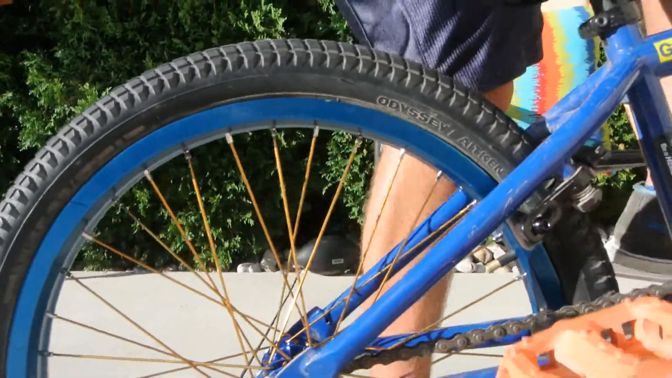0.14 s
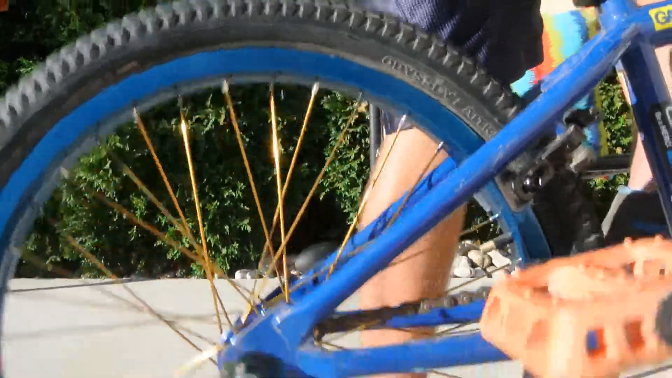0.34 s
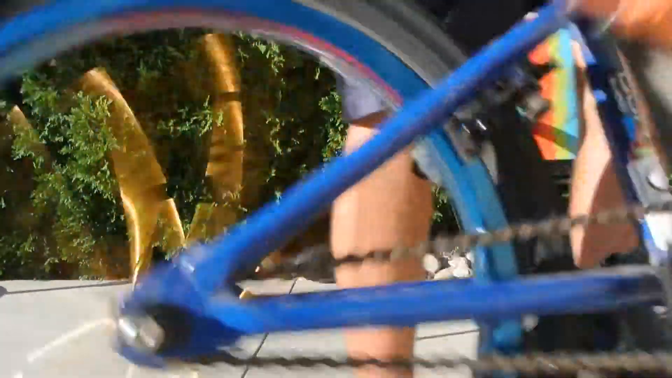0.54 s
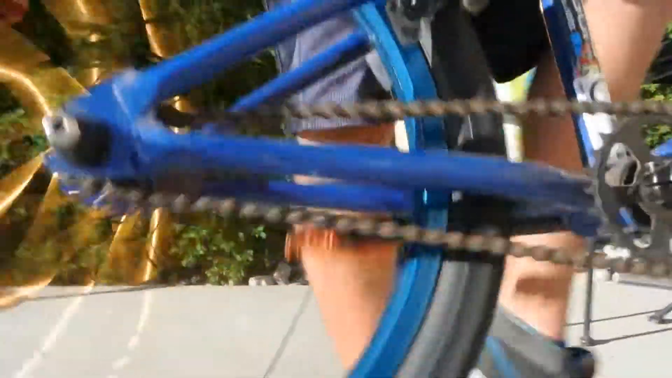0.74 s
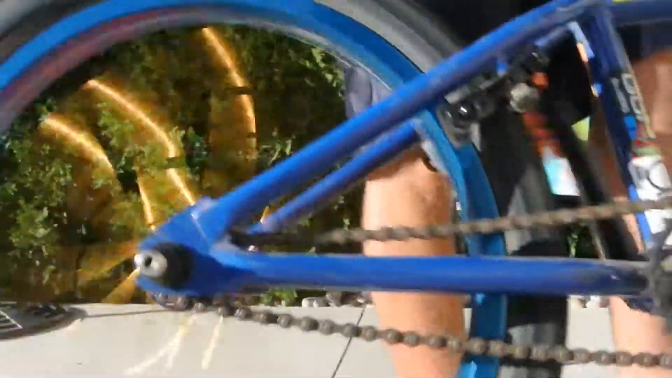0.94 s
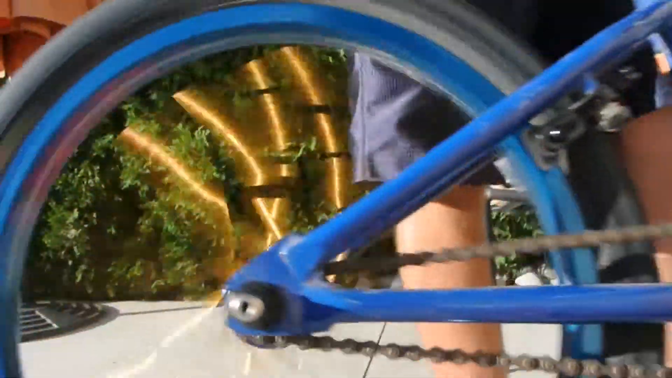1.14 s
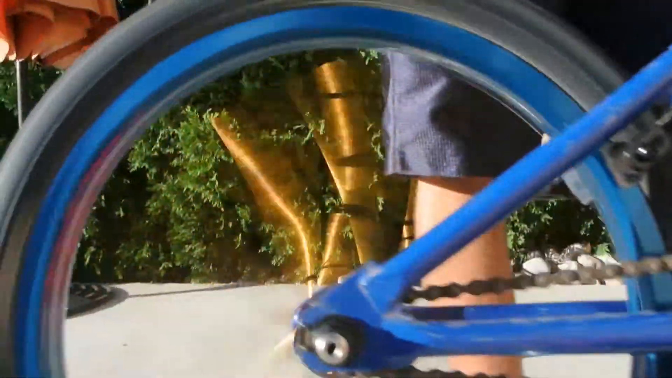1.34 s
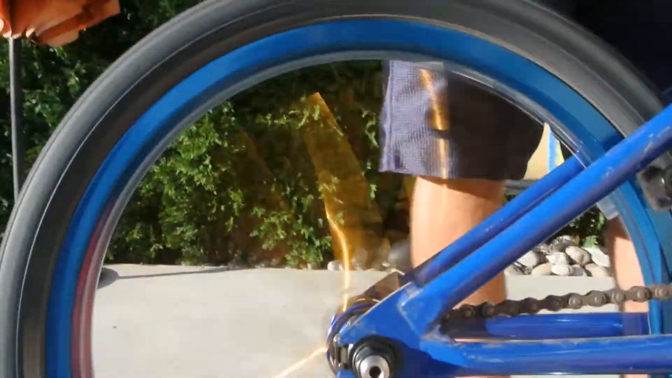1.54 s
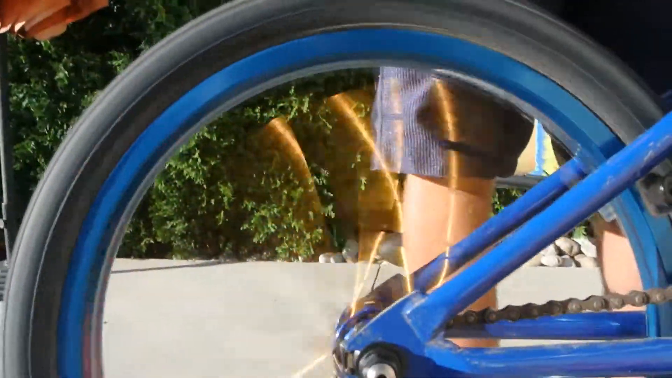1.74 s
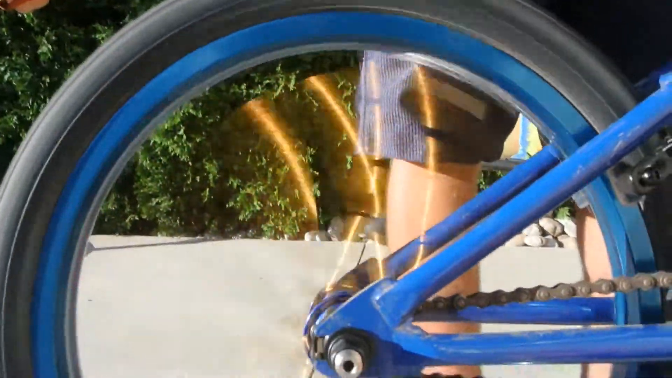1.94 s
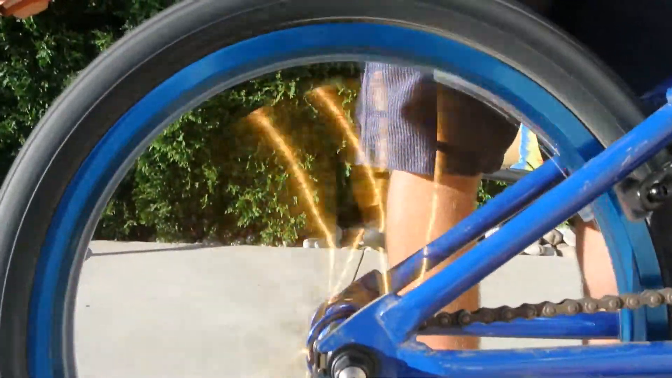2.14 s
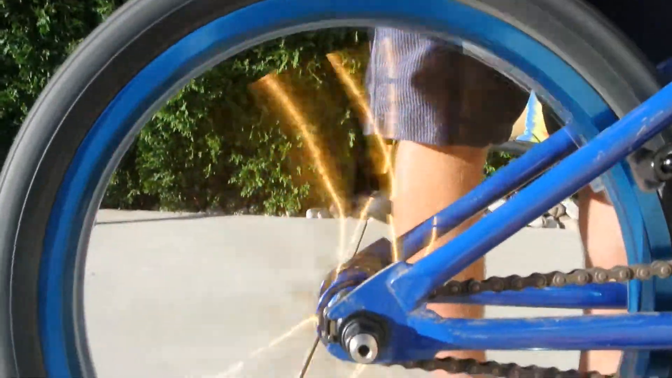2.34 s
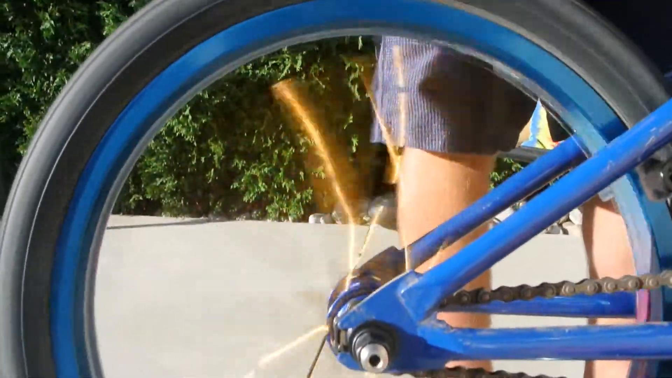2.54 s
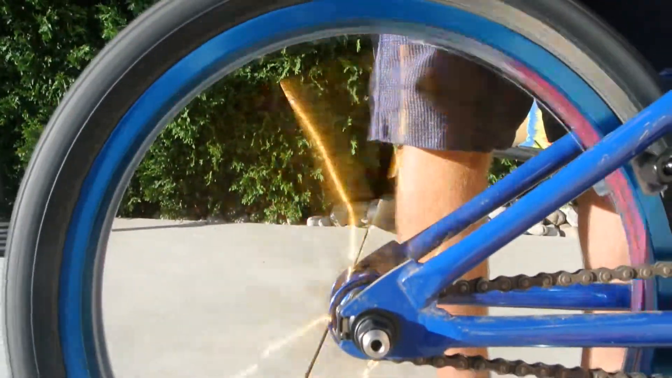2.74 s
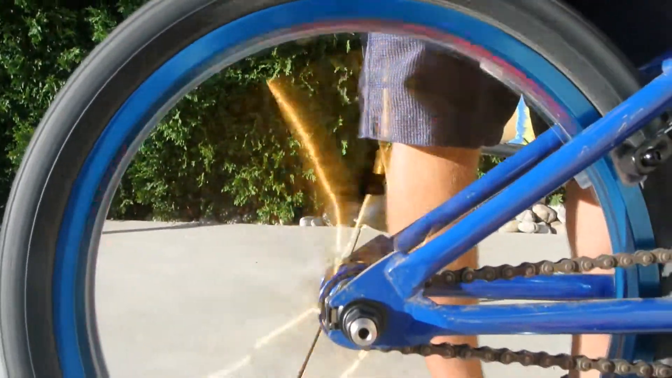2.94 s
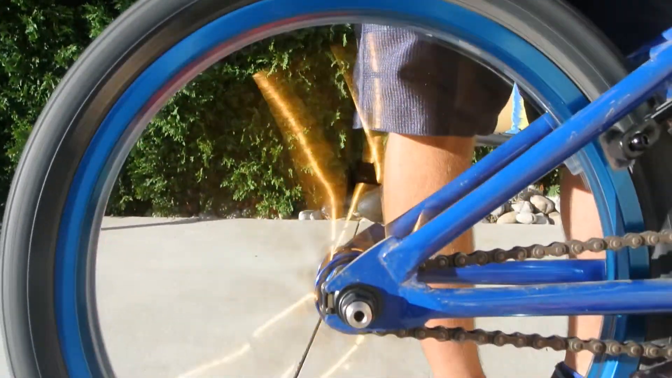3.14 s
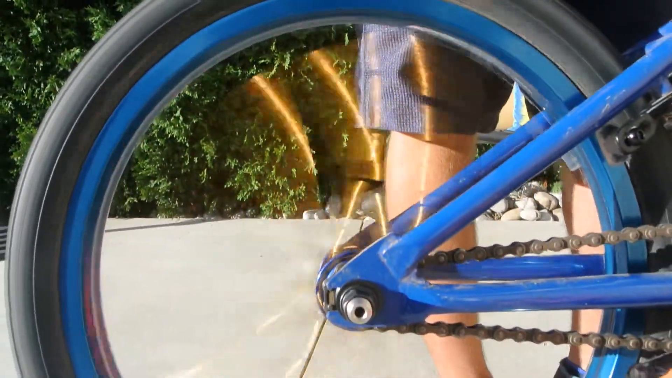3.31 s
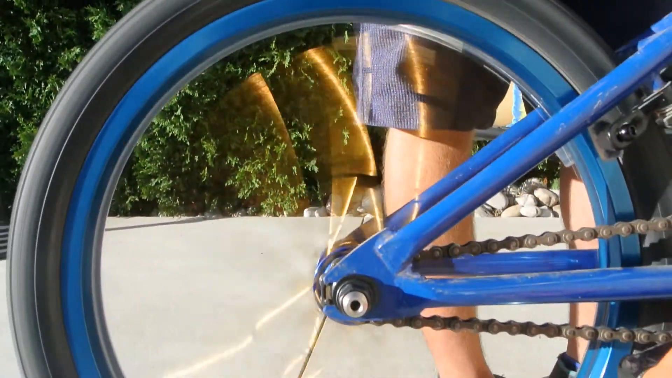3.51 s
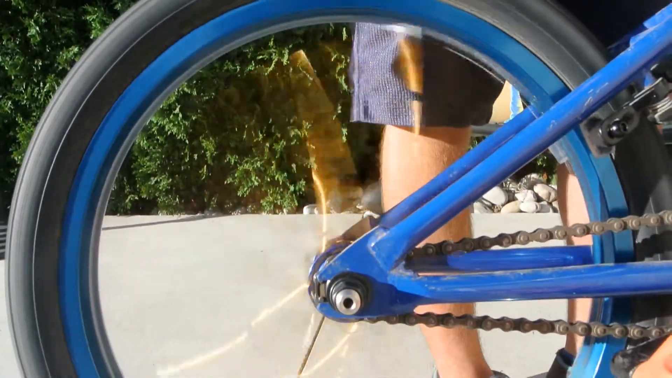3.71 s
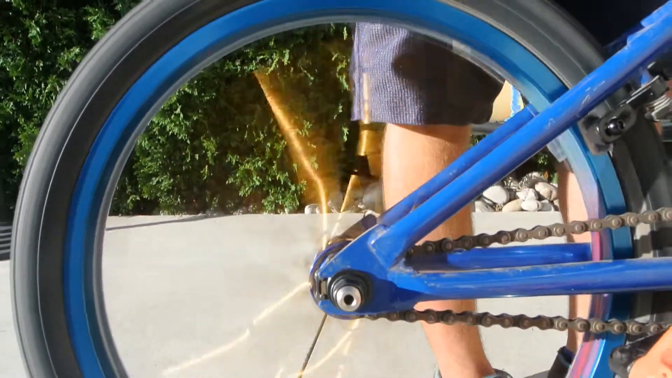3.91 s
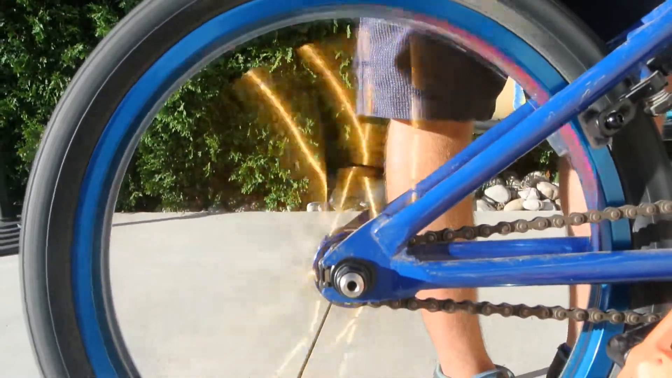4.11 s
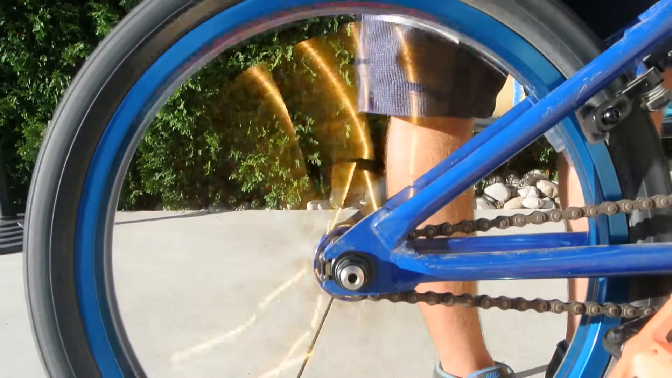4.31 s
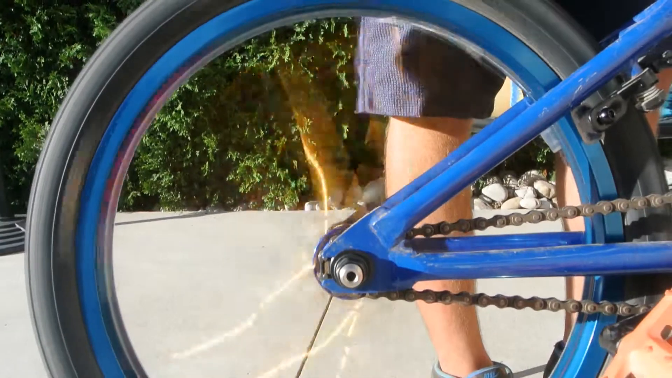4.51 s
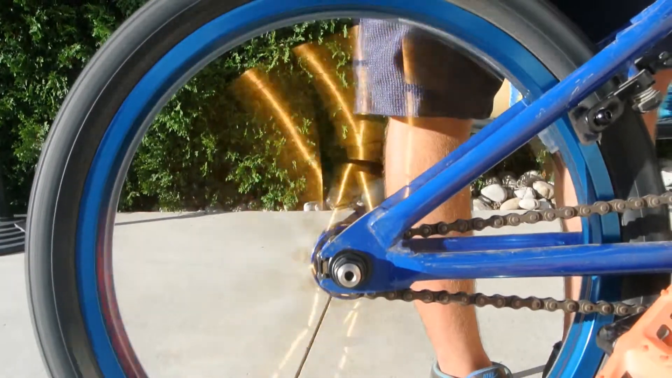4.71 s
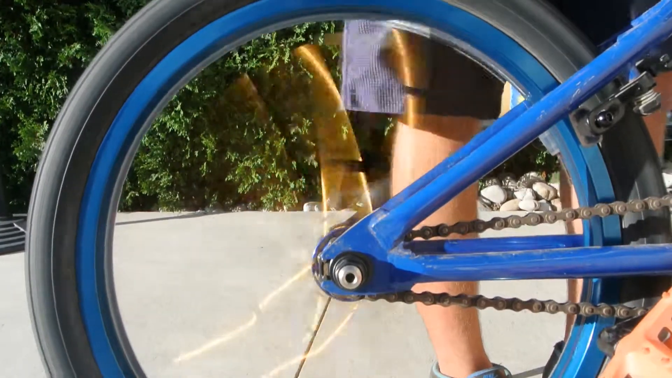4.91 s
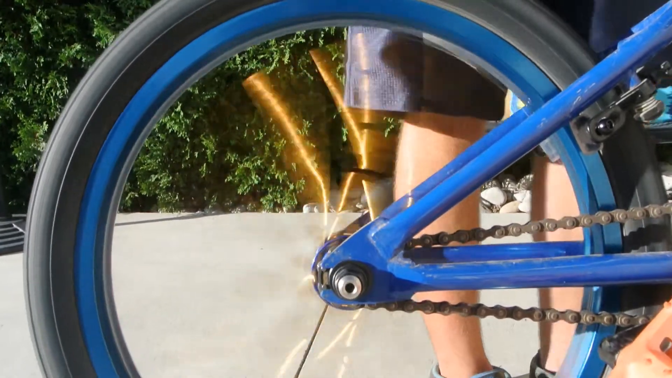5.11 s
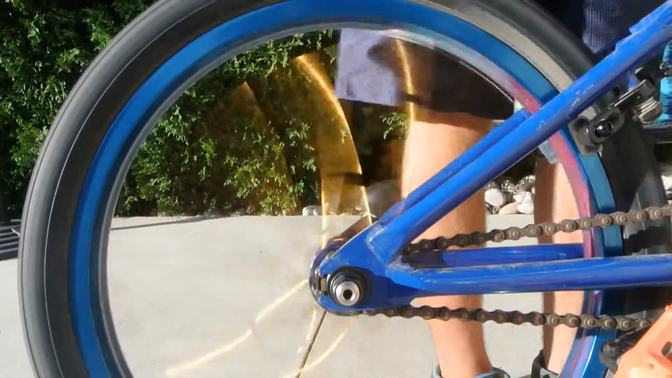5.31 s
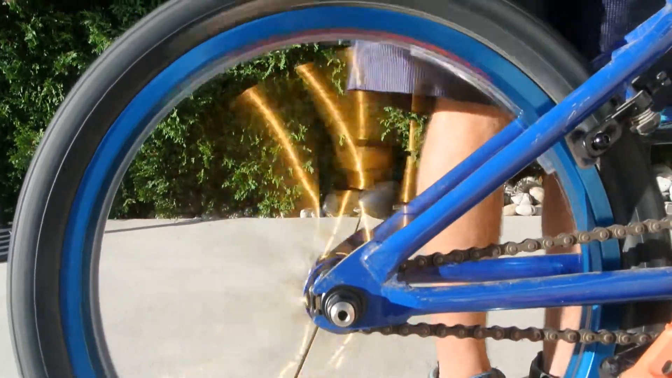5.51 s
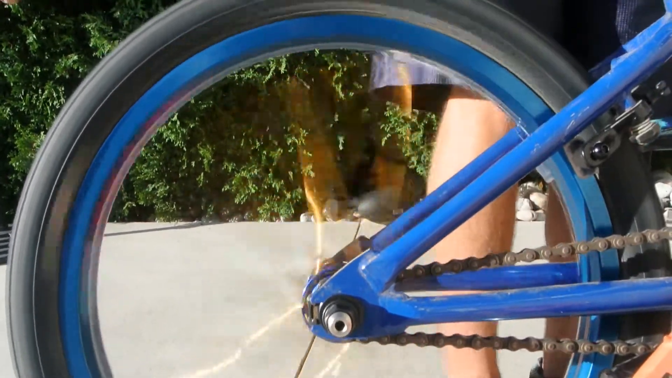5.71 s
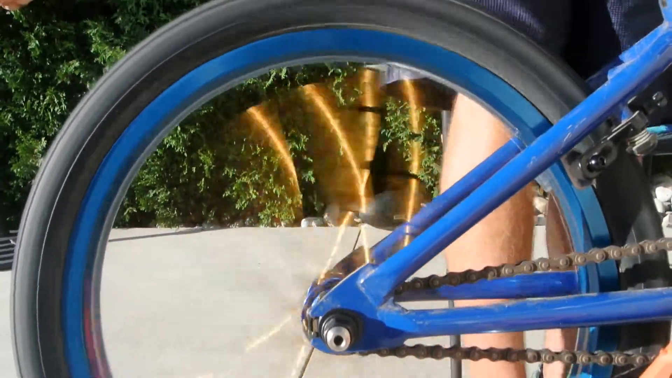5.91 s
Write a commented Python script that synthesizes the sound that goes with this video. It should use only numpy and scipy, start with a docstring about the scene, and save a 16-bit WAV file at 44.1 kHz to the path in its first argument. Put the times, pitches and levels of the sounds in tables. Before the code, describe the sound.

After a short chain rattle, a freewheeling bike wheel ticks faster and faster, settling into a steady, high metallic buzz outdoors.

```python
"""A bicycle wheel spinning free

Over an outdoor hum, a bicycle is lifted with a thin squeak, ticks and dull knocks. The crank is
pushed round, the chain rattles and the hum sinks. Then the rear wheel spins free: the pawls (small
sprung catches in its hub) snap over a ring of 24 teeth and make hub, spokes and frame ring.
Single clicks come first, then a slowing buzz whose pattern repeats each turn."""
import sys
import numpy as np
from scipy import signal
from scipy.fft import rfft, irfft, next_fast_len
from scipy.io import wavfile
from scipy.ndimage import uniform_filter1d

SR = 44100
rng = np.random.default_rng(int(sys.argv[2]) if len(sys.argv) > 2 else 0)


def dump_mix(stems):
    """Bounce the given channels to the path in sys.argv[1] as a 16-bit WAV at rate SR."""
    frames = np.atleast_2d(stems).T  # one column per channel
    limited = np.clip(frames, -1, 1)  # hard clip at full scale
    pcm = np.round(limited * 32767).astype(np.int16)
    wavfile.write(sys.argv[1], SR, pcm)


N = 266981
TEETH = 24


def amp(db):
    """Turn decibels into a gain."""
    return 10 ** (np.asarray(db) / 20)


def unit(x):
    """Scale a signal to an average power of one."""
    return x / np.sqrt(np.mean(x ** 2) + 1e-20)


def at_pitch(points, hz):
    """Read (Hz, value) points along a log pitch axis."""
    f, values = np.transpose(points)
    return np.interp(np.log(hz + 1), np.log(f + 1), values)


def curves(rows, t):
    """Read each column after the time column at times t."""
    times, *columns = np.transpose(rows)
    return [np.interp(t, times, column) for column in columns]


def filtered(x, response):
    """Filter x by a gain and phase for each frequency."""
    size = 2 * next_fast_len(N // 2 + SR // 4)
    return irfft(rfft(x, size) * response(np.fft.rfftfreq(size, 1 / SR)), size)[..., :N]


def modes(table):
    """A filter made of modes, the pitches at which an object rings."""
    return lambda f: sum((-1) ** k * amp(db) * 1j * f * width / (hz * hz - f * f + 1j * f * width)
                         for k, (hz, width, db) in enumerate(table))


def place(times, sounds):
    """Add short sounds into one track, each at its own time."""
    at = np.round(times * SR).astype(int)[:, None] + np.arange(sounds.shape[1])
    return np.bincount(at.ravel(), sounds.ravel(), N + SR)[:N]


def pan(db):
    """Two gains that make the left side db louder than the right."""
    return amp(np.array([[db / 2], [-db / 2]]))


# The hum over time. Each row: time in seconds, relative level in dB, extra bass in dB.
HUM_LEVELS = [(0, -49, 6), (.55, -50, 9), (.64, -66, 13), (.79, -61, 7), (.83, -69.5, 9), (.99, -66, 2.5),
              (1.43, -65.5, 0), (2.02, -70, -1.5), (4.9, -69.5, -2.5), (5.6, -71.5, 3.5), (6.05, -70, -4)]
# Its tone colour. Each row: pitch in Hz, level in dB.
HUM_COLOUR = [(15, -11), (76, -8), (92, -5), (300, -5.5), (600, -5.5), (1500, -7.5), (2400, -13),
              (3700, -15.5), (4050, -10), (4500, -13.5), (7000, -19), (15800, -19.5)]
# Its fuzzy tones. Each row: pitch in Hz, width in Hz, relative level in dB.
HUM_TONES = [(110.4, 12.5, -2), (196.8, 4.5, -1.5), (233.6, 4.8, -2.5), (307, 6.3, 2), (354, 3.8, 4),
             (421, 19, -12), (536, 6.1, -3), (710, 3.9, -6)]
# How alike its two sides are. Each row: pitch in Hz, likeness from 0 to 1.
HUM_LIKENESS = [(60, 0.87), (240, 0.87), (950, 0.72), (3770, 0.52), (15000, 0.5)]
# Its lean to the left. Each row: pitch in Hz, left over right in dB.
HUM_LEAN = [(60, 1.5), (240, 4.5), (950, 6), (3770, 6), (15000, 2.5)]


def outdoor_hum(patchy_db=1.2, tones_db=6, bass_hz=230):
    """Far traffic and machines: patchy noise with a few fuzzy tones."""
    spectra = signal.stft(rng.standard_normal((2, N)), nperseg=512)[2]
    patches = uniform_filter1d(rng.standard_normal(spectra.shape[1:]), size=6, axis=0)
    patches = uniform_filter1d(patches, size=12, axis=1)
    noise = signal.istft(spectra * amp(patchy_db * unit(patches)), nperseg=512)[1][:, :N]
    spread = lambda f: np.arccos(at_pitch(HUM_LIKENESS, f)) / 2
    colour = lambda f: amp(at_pitch(HUM_COLOUR, f)) * (1 + amp(tones_db) * np.abs(modes(HUM_TONES)(f)))
    mid, side = filtered(noise, lambda f: colour(f) * [np.cos(spread(f)), np.sin(spread(f))])
    hum = filtered(np.array([mid + side, mid - side]),
                   lambda f: amp(at_pitch(HUM_LEAN, f) * [[.5], [-.5]]))
    level_db, bass_db = curves(HUM_LEVELS, np.arange(N) / SR)
    bass = filtered(hum, lambda f: 1 / (1 + (f / bass_hz) ** 4) / (1 + (70 / (f + 1)) ** 8))
    return amp(level_db + 5) * (hum + (amp(bass_db) - 1) * bass) / np.std(hum)


# A thin squeak. Each row: time in seconds, pitch in Hz, level in dB.
SQUEAK_PATH = [(.05, 11500, -72), (.07, 11900, -56), (.1, 12700, -54), (.14, 12700, -63), (.16, 12600, -82)]


def squeak(waver_hz=150):
    """A faint whistle whose pitch wavers."""
    t = np.arange(N) / SR
    hz, db = curves(SQUEAK_PATH, t)
    waver = waver_hz * unit(uniform_filter1d(rng.standard_normal(N), size=200))
    sounding = (t > SQUEAK_PATH[0][0]) * (t < SQUEAK_PATH[-1][0])
    return pan(3) * amp(db) * sounding * np.sin(2 * np.pi * np.cumsum(hz + waver) / SR)


# Ticks of the drive. Each row: time in seconds, relative level in dB, change to the low ring in dB.
TICKS = [(0.2144, -36, -23), (0.2314, -35, -21), (0.2514, -44, -13), (0.2804, -42, 3), (0.29, -40, -5),
         (0.3104, -45, -11), (0.514, -28, -27), (0.5735, -8.5, -14.5), (0.616, -16.5, -9.5),
         (0.633, -18, -17), (0.6444, -28, -18), (0.678, -26, -10), (0.6944, -26, -5.5), (0.742, -13, -13.5),
         (0.769, -18, -23), (0.781, -31, -30), (0.796, -15.5, -14.5)]


def metal_ticks():
    """Short bursts ring the steel parts of the drive, some bright, some fuller."""
    times, db, low_db = np.transpose(TICKS)
    starts, t = times - .001, np.arange(1024) / SR
    envelope = (1 - np.exp(-t / 0.00065)) * (amp(-60 * t / 0.016) + 0.18 * amp(-60 * t / 0.11))
    bursts = envelope * rng.standard_normal((2, len(starts), len(t)))
    high = place(starts, amp(db - 5)[:, None] * bursts[0])
    low = place(starts, amp(db + low_db + 7.5)[:, None] * bursts[1])
    high_ring = filtered(high, modes([(7750, 1100, 2), (11200, 2500, 2), (13900, 4100, -3)]))
    low_ring = filtered(low, modes([(2180, 1400, -32), (3730, 1160, 5)]))
    return pan(8.6) * high_ring + pan(6.8) * low_ring


# Dull knocks. Each row: start in seconds, relative level in dB, change to the high ring in dB,
# seconds to fade by 60 dB.
KNOCKS = [(0.241, -36, -24, 0.047), (0.692, -38.5, -13, 0.11), (0.7237, -16, 3.5, 0.016),
          (0.764, -34, -9, 0.046), (0.976, -49.5, -17, 0.12), (1.059, -36, -15, 0.023),
          (5.183, -52.5, 2, 0.085), (5.209, -58, 18, 0.024)]
# The knocked frame's modes. Each row: pitch in Hz, width in Hz, relative level in dB.
LOW_MODES = [(274, 310, 0.5), (470, 410, 6), (756, 820, -0.5)]
HIGH_MODES = [(960, 2300, -7), (1470, 350, 9.5), (2610, 4200, -8)]


def frame_knocks():
    """Soft blows: each is a dying puff of noise that rings the frame."""
    starts, db, high_db, fade_s = np.transpose(KNOCKS)[..., None]
    t = np.arange(4096) / SR
    envelope = amp(db - 60 * t / fade_s) * (1 - np.exp(-t / 0.0023))
    puffs = envelope * rng.standard_normal((2, len(starts), len(t)))
    low = filtered(place(starts[:, 0], puffs[0]), modes(LOW_MODES))
    high = filtered(place(starts[:, 0], amp(high_db) * puffs[1]), modes(HIGH_MODES))
    return pan(7.8) * (amp(19) * low + amp(7) * high)


# The running chain. Each row: time in seconds, level in dB.
CHAIN_LEVELS = [(0.565, -60), (0.571, -36), (0.589, -28.5), (0.711, -24.5), (0.811, -29), (0.815, -49),
                (0.85, -31)]
# The tone colour of its links. Each row: pitch in Hz, relative level in dB.
CHAIN_COLOUR = [(120, -36), (200, -21), (310, -11), (393, -16), (526, -16), (1890, -15), (3390, -12.5),
                (10700, -12.5), (14100, -1), (15700, -4)]


def chain(hits_per_s=900, spread_db=5):
    """Rollers drop onto the sprockets as dense, uneven ticks over a hiss."""
    t = np.arange(N) / SR
    level = amp(curves(CHAIN_LEVELS, t)[0]) * (t > CHAIN_LEVELS[0][0]) * (t < CHAIN_LEVELS[-1][0])
    hits = (rng.random(N) < hits_per_s / SR) * amp(spread_db * rng.exponential(size=N))
    swell = np.convolve(hits, np.exp(-np.arange(400) / 70))[:N]
    noise = rng.standard_normal((3, N))
    rattle = np.sqrt(0.6 + swell) * (noise[0] + 0.87 * noise[1:])
    return pan(4.1) * level * unit(filtered(rattle, lambda f: amp(at_pitch(CHAIN_COLOUR, f))))


# The first single clicks. Each row: start in seconds, then relative levels in dB for pawls,
# toothed ring, spokes, hub shell and frame.
FIRST_CLICKS = [(0.816, -13, -24.5, -39, -24.5, -43), (0.8566, -13, -26, -43, -44, -40.5),
                (0.887, -12.5, -28, -41, -39, -46), (0.918, -15.5, -32, -53, -26, -45),
                (0.948, -17, -30.5, -36, -33, -47), (0.978, -16, -32, -47, -28, -46),
                (1.0002, -18, -32, -48, -26.5, -57), (1.0202, -15, -31, -49, -28.5, -41.5),
                (1.0407, -15.5, -30, -41, -28.5, -46), (1.061, -17, -33, -40, -27, -50),
                (1.0802, -17.5, -37, -37, -30, -44), (1.0998, -17, -40, -28, -28, -44),
                (1.1194, -18, -31, -40, -38, -43), (1.1392, -17, -32, -28, -35, -41),
                (1.159, -19, -29, -38, -35, -41.5), (1.1786, -15.5, -32, -36, -26, -42),
                (1.1976, -18, -30, -36, -25, -43), (1.2157, -15.5, -32, -43, -27, -45),
                (1.2344, -18, -32, -39, -28.5, -45), (1.2526, -14.5, -36, -44, -24, -62),
                (1.27, -18, -36, -29.5, -26.5, -46), (1.285, -18, -27.5, -35, -39, -46),
                (1.3029, -18, -30.5, -42, -30.5, -63), (1.3194, -23, -27, -38, -38, -49),
                (1.3323, -16, -34, -45, -26.5, -43), (1.3454, -19, -32, -45, -37, -45),
                (1.3567, -18, -30, -35, -35, -46), (1.3678, -18, -30, -43, -29.5, -39.5)]
# For each part in WHEEL_PARTS: which of those five levels it follows, and the dB it adds.
CLICK_FOLLOWS = np.array([4, 4, 4, 3, 3, 2, 1, 0, 0, 0])
CLICK_EXTRA_DB = [-1.5, 0.24, -1.9, -0.78, 1.6, 0.28, 1.7, 1.2, -1, -0.019]
# The crank lags the wheel more and more, then stops. Each row: time in seconds, tooth (0 at the stop).
CRANK_LAG = [(1.368, -15), (1.3907, -13), (1.4103, -11), (1.4266, -9), (1.507, 0)]


def passing_teeth(first_gap_s=.0089975, gap_growth_s=2.52e-6):
    """Clicks speed up, then drag slows the wheel. Gives tooth numbers, times and opening levels."""
    lag_s, lag_tooth = np.transpose(CRANK_LAG)
    clicks = np.array(FIRST_CLICKS)
    tooth = np.arange(lag_tooth[0] + 1 - len(clicks), N / SR / first_gap_s).astype(int)
    coasting = lag_s[-1] + first_gap_s * tooth + gap_growth_s * tooth * (tooth - 1) / 2
    times = np.where(tooth < 0, np.interp(tooth, lag_tooth, lag_s), coasting)
    times[:len(clicks)] = clicks[:, 0]
    levels = clicks[:, 1:]
    opening_db = (levels - levels.mean(axis=0))[:, CLICK_FOLLOWS] + CLICK_EXTRA_DB
    heard = times < N / SR
    return tooth[heard], times[heard], opening_db


# How hard each part is shaken round one turn. Each row: tooth number, strength in dB.
AXLE_HITS = [(0, -9), (4, -9), (8, -18), (13, 2.5), (16, 0), (19, 10.5), (22, 7.5)]
STAYS_HITS = [(0, -2), (3, -15.5), (4, 3.5), (6, 6), (11, 5.5), (13, 3.5), (16, -3), (17, 3.5), (21, 6.5),
              (23, 0.5)]
FRAME_HITS = [(0, -0.5), (1, -9), (3, 0), (6, 4), (10, -3), (14, 5), (16.5, 1.5), (20, 8), (23, -1.5)]
SHELL_HITS = [(0, -0.5), (3, -0.5), (4, -1), (6.5, -1.5), (9, -7), (10.5, 2.5), (12, 2), (15, 1.5),
              (16, -29), (17, -16), (19, 4.5), (21, 4.5)]
FLANGE_HITS = [(0, 7.5), (3, 5.5), (4, -9), (5, -5.5), (6, -0.5), (9, -8), (11, -7), (12, 3.5), (15, 4),
               (16, -15), (17, -13), (18, 4), (19, 8), (22, 7)]
SPOKE_HITS = [(0, 3), (2, 4), (4, 8.5), (6, 0), (7, -16), (10, -7), (13, -3.5), (15, -0.5), (18, -2.5),
              (21, -8), (22, 4)]
# Teeth struck harder or softer. Each row: tooth number, then dB for ring, pawl, pawl tip and spring.
UNEVEN_TEETH = [(0, -1, 1, -1, 0), (1, -1, 1, -1, -2.5), (2, 1, 5, 7.5, 4), (3, .5, 2.5, 3.5, 1.5),
                (4, 1, 0, 0, -2), (5, -.5, -2.5, -2, -3), (6, .5, -1, 0, 3), (7, 1.5, -2.5, -3, -3),
                (9, .5, 2.5, 3.5, 2.5), (11, -1, -1.5, 3, 0), (12, 0, 1.5, -3, -1), (13, -1, -6, -6, -1.5),
                (14, -1, 1, -2.5, -2.5), (15, 1, 3, 0, -3), (17, 1, 2, -3, -2.5), (18, .5, -4, -2, 1),
                (21, 0, 0, 3.5, 3.5), (23, -1, -1, 1, 2.5)]


def turn_patterns(uneven_db=0.5):
    """How hard each tooth strikes each part, in dB, the same every turn."""
    steel = -uneven_db * rng.standard_normal((TEETH, 4))
    uneven = np.array(UNEVEN_TEETH)
    steel[uneven[:, 0].astype(int)] = uneven[:, 1:]
    turns = (AXLE_HITS, STAYS_HITS, FRAME_HITS, SHELL_HITS, FLANGE_HITS, SPOKE_HITS)
    return [np.interp(np.arange(TEETH), *np.transpose(turn), period=TEETH)
            for turn in turns] + list(steel.T)


def part_ring(table, widen=1.4):
    """A filter for one wheel part, which rings only around its own band of pitches."""
    low, high = table[0][0] - table[0][1], table[-1][0] + table[-1][1]
    band = modes([(np.sqrt(low * high), widen * (high - low), 0)])

    def response(f):
        power = sum(np.abs(modes([mode])(f)) ** 2 for mode in table) * np.abs(band(f)) ** 4
        cepstrum = irfft(np.log(power / power.mean() + 1e-12) / 2)
        half = len(cepstrum) // 2
        # Folding makes the ring come after the blow, never before it.
        folded = np.r_[cepstrum[0], 2 * cepstrum[1:half], cepstrum[half], np.zeros(half - 1)]
        return np.exp(rfft(folded))
    return response


def pawl_blows(tooth, table, length_s, alike, new, stereo=0.067):
    """Pawls land not quite together. Gives each tooth's own rough blow, and all blows for each side."""
    t = np.arange(256) / SR
    shape = t / length_s * np.exp(-t / length_s * 2)
    rough = shape / np.linalg.norm(shape) * rng.standard_normal((TEETH + 2 * len(tooth), len(t)))
    own = np.sqrt(alike) * (t == 0) + np.sqrt(1 - alike) * rough[:TEETH]
    band = np.abs(part_ring(table)(np.fft.rfftfreq(len(t), 1 / SR)))
    own *= np.linalg.norm(band) / np.linalg.norm(band * rfft(own), axis=1, keepdims=True)
    mid, side = rough[TEETH:].reshape(2, len(tooth), -1)
    repeated = np.sqrt(1 - new) * own[tooth % TEETH]
    return own, [repeated + np.sqrt(new) * (mid + way * stereo * side) for way in (1, -1)]


def late_ring(times, gain, fade_s, stereo=2.29):
    """Spokes, rim and walls ring on: noise that each blow feeds and that dies away."""
    keep = amp(-120 / (fade_s * SR))
    power = signal.lfilter([1 - keep], [1, -keep], place(times, gain[:, None] ** 2))
    noise = rng.standard_normal((3, N))
    return np.sqrt(np.abs(power)) * (noise[0] + stereo * noise[1:])


def turning_ring(shaking, table, trade_db, tooth, times):
    """Neighbouring modes trade strength as the hub turns its faces to the listener."""
    each_turn = uniform_filter1d(rng.standard_normal(TEETH), size=3, mode="wrap")[tooth % TEETH]
    drift = uniform_filter1d(rng.standard_normal(len(times)), size=5)
    share = np.interp(np.arange(N) / SR, times, .5 + .5 * np.tanh(3 * (each_turn + .6 * drift)))
    faces = [[(hz, width, db + way * trade_db * (-1) ** k) for k, (hz, width, db) in enumerate(table)]
             for way in (1, -1)]
    one, other = (filtered(shaking, part_ring(face)) for face in faces)
    return share * one + (1 - share) * other


# The modes of ten parts. Each row: pitch in Hz, width in Hz, relative level in dB.
AXLE_MODES = [(1060, 206, 0)]
STAYS_MODES = [(1430, 214, -5.5), (1735, 260, 2)]  # the thin tubes that hold the wheel
FRAME_MODES = [(2060, 190, 2.5), (2562, 430, 2.5)]
SHELL_MODES = [(3072, 324, -3), (3250, 400, 2), (3204, 90, 1.5), (3424, 62, 5.5)]  # the hub's casing
FLANGE_MODES = [(3650, 380, 0), (3740, 480, 0), (4040, 140, 0)]  # the lip that holds the spokes
SPOKE_MODES = [(4370, 380, 0), (4690, 130, 14), (4900, 420, -7)]
RING_MODES = [(4150, 310, 5.5), (5200, 570, -3), (6200, 1200, -5), (7260, 280, -4.5), (7850, 760, 3.5),
              (8980, 1000, 1.5), (9370, 430, 0.5)]
PAWL_MODES = [(10060, 720, -4.5), (10770, 170, -1), (11280, 330, 0)]
TIP_MODES = [(11560, 260, 1.5), (11890, 90, 1), (12370, 360, -3.5)]
SPRING_MODES = [(12700, 290, 4.5), (13230, 330, -4.5), (13850, 450, -5.5), (14400, 600, -7),
                (14800, 500, -10.5), (15600, 600, -13)]
WHEEL_PARTS = (AXLE_MODES, STAYS_MODES, FRAME_MODES, SHELL_MODES, FLANGE_MODES,
               SPOKE_MODES, RING_MODES, PAWL_MODES, TIP_MODES, SPRING_MODES)
# How each part is struck. Each row: relative level in dB, weight of body, weight of tilt, blow length # in
# seconds, seconds to fade by 60 dB, rebound in dB, left over right in dB, delay in seconds, # random scatter in
# dB.
PART_STRIKES = [(-32, 0.5, 0.14, 0.00047, 0.055, -18, 5.5, -0.0011, 5),
                (-20.5, 1.23, -0.48, 0.0018, 0.039, -21, 6.5, .0002, 2),
                (-14, 1.5, -0.55, 0.0024, 0.3, -3, 6, 0.0002, 1.34),
                (-2.5, 2.5, 0.42, 0.003, 0.3, -18, 8, 0.0003, -0.5),
                (-5.5, 4.5, 0.65, 0.0027, 0.24, -13, 7.5, .0004, -0.3),
                (-12.5, 3.5, 0.56, 0.0012, 0.16, -6, 5.5, 0.0001, -1),
                (-5.5, 1.63, 0.39, 0.00049, 0.052, -13.5, 4.5, 0.0002, 1.32),
                (-3, 0, 0.59, 0.0015, 0.076, -34, 4, 0.0001, 1.2),
                (-1.5, 0.7, 0.65, 0.0012, 0.055, -33, 3.5, 0.00005, 1.9),
                (3, 2, 0.41, 0.0016, 0.043, -40, 3, 0.0003, 1)]
# Each part's texture. Each row: share alike for all teeth, share new at each blow, late ring in dB.
PART_TEXTURES = [(1, 0, -7.5), (0.95, 0.03, -15), (0.93, 0.04, -7.5), (0.95, 0.05, -10),
                 (0.93, 0.06, -12.5), (0.85, 0.2, -5), (0.77, 0.1, -4.5), (0.04, 0.02, -7.5),
                 (0, 0.5, -12.5), (0.5, 0.15, -8)]
# For each part: the change to its late ring during the early clicks, in dB.
EARLY_RING_DB = [-3, 1, 3.5, -2, 1, 0, -1.5, -5, 2, -0.5]
# For each part: how far its modes trade strength, in dB.
MODE_TRADE_DB = [0, 3, 3, 2, 5.5, -1, 2.5, 5.5, 3.5, 8.5]
# The clicks over time. Each row: time in seconds, then relative level, body (fullness) and tilt
# (brightness), all in dB.
CLICK_LEVELS = [(.816, -9, -3.5, 0), (1.36, -10, -2, 1.5), (1.41, -17.5, 1, 2.5), (1.48, -15.5, -1, 0.5),
                (1.6, -12.5, -1, 0.5), (1.9, -12.5, -2.5, -1), (2.9, -11.5, -3, -2), (3.4, -16, -1.5, 0.5),
                (4.2, -15.5, -1.18, -0.5), (4.6, -16.5, 0.17, -1.5), (5.35, -16, -0.8, 0),
                (5.75, -13.5, -3, 0.5), (6.05, -15, -2, -0.5)]
# The bike sways in the hand, so its parts face us differently. Each row: time in seconds, dB for
# axle, flange, spokes, pawl and pawl tip, then the depth of the turn pattern as a multiplier.
BIKE_SWAY = [(1.5, -8, 0.5, 2.2, 0, -3, 0.95), (2.2, -9, 0, 3, -1.5, 1.5, 0.69),
             (2.9, -18, -0.5, 3, -1, 0.3, 0.63), (3.5, -16, -0.5, -3, -0.2, 4.5, 0.88),
             (4.1, -7, 0.5, 0.5, 0.5, 1.5, 0.82), (4.55, -1, 2, -0.5, 1.5, -0.5, 0.64),
             (5.1, 0, 3, 2.5, 2, 0.7, 0.74), (5.5, -11, 3, .3, -2, 1, 0.64),
             (6.05, -4, -1.5, 1, -3, 4.5, 0.91)]


def freewheel(tooth, times, opening_db, rebound_s=0.0041, settle_teeth=16):
    """Each tooth gives a short blow, much the same every turn, that rings every part of the wheel."""
    early = np.clip(-tooth / settle_teeth - .5, 0, 1)  # falls to 0 as the turn pattern sets in
    level_db, body_db, tilt_db = curves(CLICK_LEVELS, times)
    axle, flange, spokes, pawl, tip, depth = curves(BIKE_SWAY, times)
    sway_db = (axle, 0, 0, 0, flange, spokes, 0, pawl, tip, 0)
    patterns = turn_patterns()
    wheel = np.zeros((2, N))
    for part, table in enumerate(WHEEL_PARTS):
        db, body, tilt, length_s, fade_s, rebound_db, pan_db, delay_s, scatter_db = PART_STRIKES[part]
        alike, new, late_db = PART_TEXTURES[part]
        own, sides = pawl_blows(tooth, table, length_s, alike, new)
        uneven_db = sway_db[part] + depth * (1 - early) * patterns[part][tooth % TEETH]
        uneven_db += scatter_db * rng.standard_normal(len(times))
        uneven_db[:len(opening_db)] = opening_db[:, part]
        gain = amp(level_db + db + body * body_db + tilt * tilt_db + uneven_db)
        starts = times + delay_s
        blows = np.array([place(starts, gain[:, None] * side) for side in sides])
        late = late_ring(starts + length_s, gain * amp(EARLY_RING_DB[part] * early), fade_s)
        # The pawl bounces: a fainter second blow follows each click about 4 ms later.
        rebound = place(starts + rebound_s, gain[:, None] * own[(tooth + TEETH // 3) % TEETH])
        shaking = blows + amp(rebound_db) * rebound + amp(late_db) * late
        wheel += pan(pan_db) * turning_ring(shaking, table, MODE_TRADE_DB[part], tooth, times)
    return amp(2) * wheel


# One frame tube's mode: pitch in Hz, width in Hz, level in dB.
TUBE_MODE = (667, 220, 0)
# How hard it is shaken. Each row: time in seconds, relative level in dB.
TUBE_LEVELS = [(1.35, -35), (1.6, -29.5), (2.8, -29), (3.1, -40), (4.3, -38), (4.7, -35), (5.4, -31),
               (6.05, -56)]


def frame_tube(times):
    """A frame tube hums at the multiple of the click rate nearest its own pitch."""
    taps = place(times, amp(curves(TUBE_LEVELS, times)[0])[:, None])
    return pan(6.2) * amp(5) * filtered(taps, lambda f: modes([TUBE_MODE])(f) ** 2)


def scene():
    """The spinning wheel, the sounds of handling the bike and the outdoor hum, in stereo."""
    tooth, times, opening_db = passing_teeth()
    wheel = freewheel(tooth, times, opening_db) + frame_tube(times)
    return wheel + chain() + metal_ticks() + frame_knocks() + squeak() + outdoor_hum()


def record(dry, edge_hz=15890, top_hz=16800):
    """The highest treble drops 55 dB above edge_hz and is silent above top_hz."""
    edge = lambda f: amp(-55 * (.5 + .5 * np.tanh((f - edge_hz) / 70)))
    return filtered(dry, lambda f: edge(f) * (f < top_hz))


dry = scene()
out = record(dry)
dump_mix(out)
```